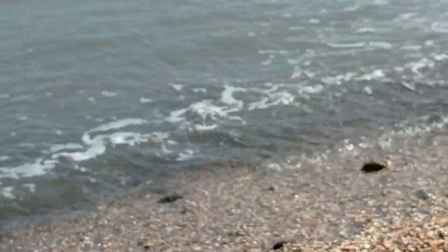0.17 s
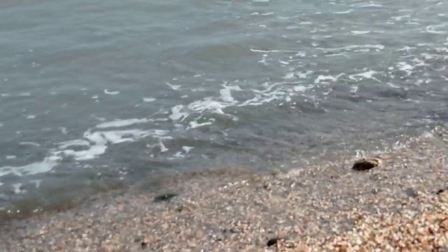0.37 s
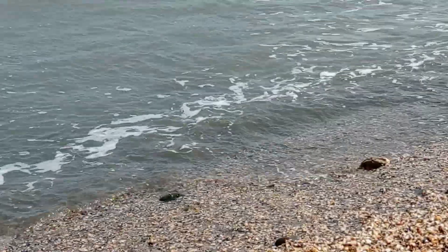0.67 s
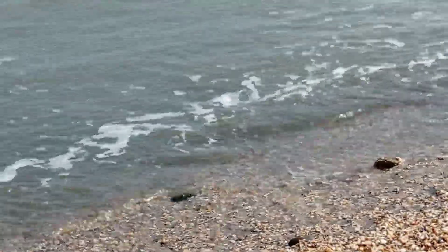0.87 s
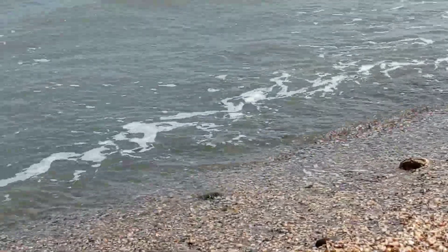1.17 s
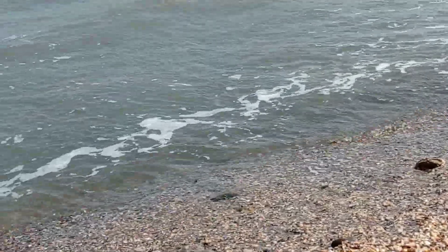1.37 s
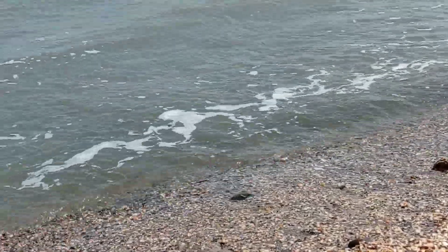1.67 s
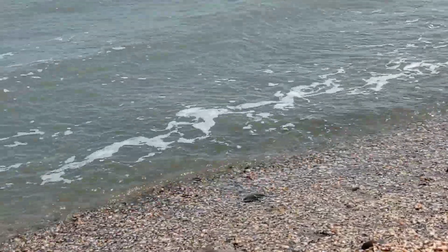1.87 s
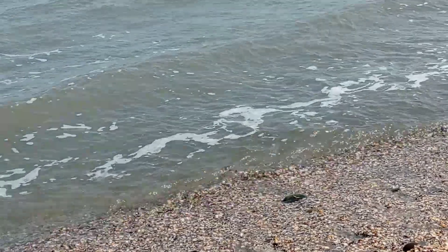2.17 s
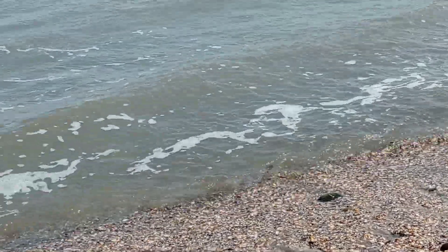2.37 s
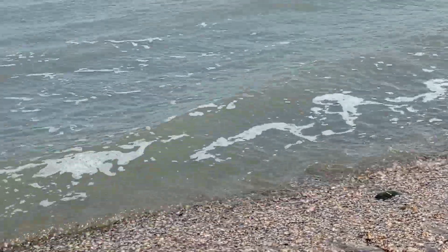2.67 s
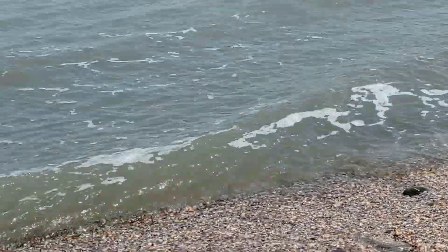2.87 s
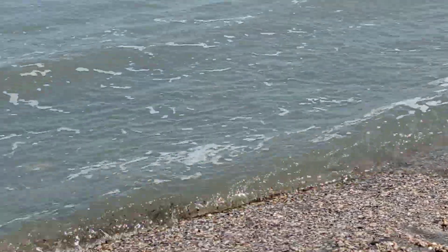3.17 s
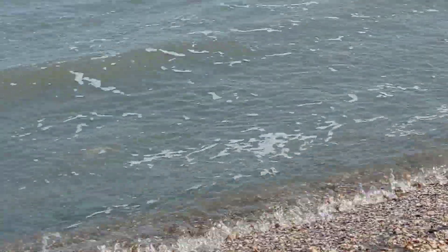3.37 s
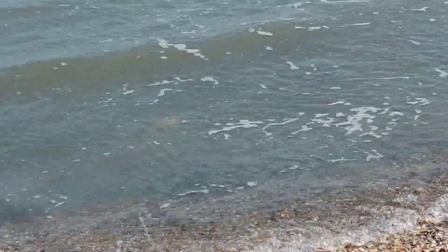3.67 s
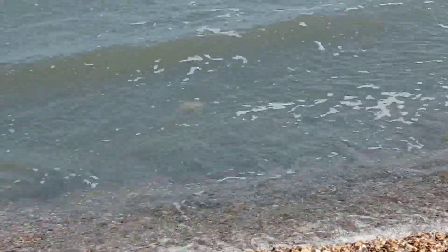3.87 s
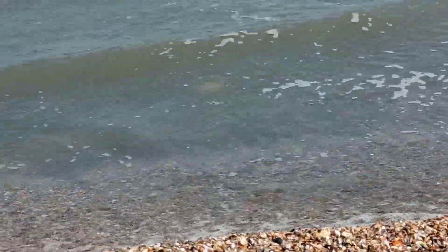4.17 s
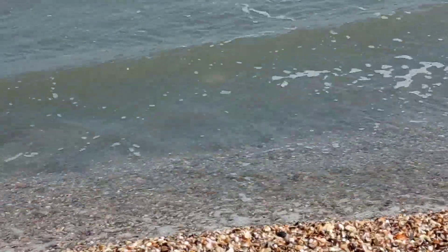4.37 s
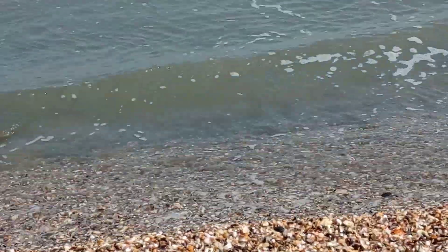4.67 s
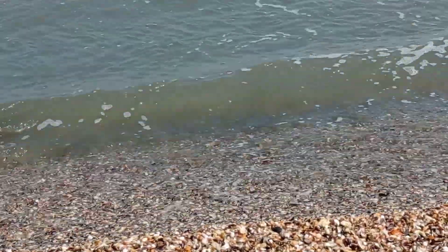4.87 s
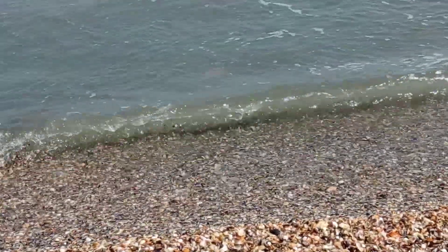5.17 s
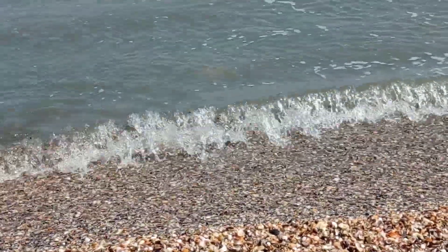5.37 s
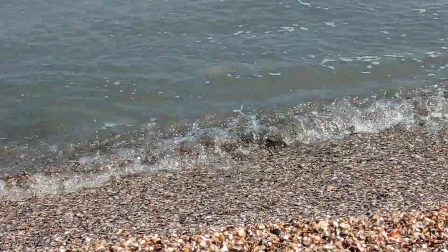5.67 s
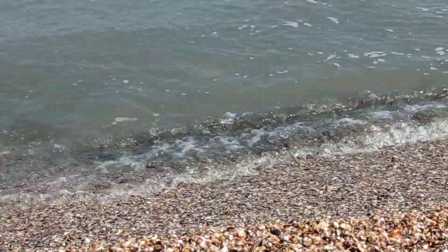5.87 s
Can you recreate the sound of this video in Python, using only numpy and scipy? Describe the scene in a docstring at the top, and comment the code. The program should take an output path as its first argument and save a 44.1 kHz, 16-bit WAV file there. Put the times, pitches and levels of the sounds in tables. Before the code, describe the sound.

Wind buffets a small microphone at the water's edge, making irregular bassy flutters and bumps. Behind it the sea roars smoothly and evenly. At first there is little close water; later trapped air gurgles and thin foam hiss swells at about three seconds, fades slowly, and swells again past five. Sparse high ticks of drops and shells and some low watery plops add detail.

```python
"""Small waves wash onto a beach of pebbles and shells, heard through a small microphone in a breeze.
From the start, eddies of wind on the microphone port make a lumpy rumble (shaped noise) with single thumps
(short tones), and surf along the shore roars steadily (smooth noise). Faint gurgles of trapped air (ringing
bubbles) soon grow; from about 1.5 s foam fizzes in surges (dense tiny bubbles, clicks and hiss).
Drops then tick on the shells (short high tones), and late on a few large air pockets plop."""
import sys
import numpy as np
from scipy import signal
from scipy.fft import rfft, irfft, next_fast_len
from scipy.io import wavfile

SR = 44100
rng = np.random.default_rng(int(sys.argv[2]) if len(sys.argv) > 2 else 0)


def store_pcm(level_fs):
    """Save levels as 16-bit WAV."""
    pcm = np.round(np.clip(level_fs, -1, 1) * 32767).astype(np.int16)
    wavfile.write(sys.argv[1], SR, np.atleast_2d(pcm).T)


N = 265482  # length of the scene [samples]


def from_db(db):
    """Turns decibels into a gain."""
    return 10 ** (np.asarray(db) / 20)


def rms_one(x):
    """Scales a signal to an rms (average strength) of 1."""
    return x / np.sqrt(np.mean(x ** 2) + 1e-20)


def in_time(rows):
    """Draws straight lines between the rows of a time table; each column becomes one value a sample."""
    times, *columns = np.transpose(rows)
    return [np.interp(np.arange(N) / SR, times, column) for column in columns]


def drift(rate_hz):
    """Slow random wandering with a spread of 1: noise smoothed twice by a one-pole low-pass."""
    step = 20  # one slow value for every 20 samples
    settle = 4000  # slow values thrown away while the filter settles
    r = np.exp(-2 * np.pi * rate_hz * step / SR)
    noise = rng.standard_normal(N // step + settle + 2)
    slow = signal.lfilter([1], [1, -2 * r, r * r], noise)[settle:]
    return np.interp(np.arange(N) / step, np.arange(len(slow)), rms_one(slow))


def colour(x, spectrum):
    """Filters a signal by a table of (frequency [Hz], level [dB]), then sets its rms to 1."""
    size = next_fast_len(N)
    hz = np.arange(1, size // 2 + 2) * SR / size
    points = np.array(spectrum)
    level_db = np.interp(np.log(hz), np.log(points[:, 0]), points[:, 1])
    shaped = irfft(rfft(x, size) * from_db(level_db), size)[:N]
    return rms_one(shaped)


def ring(clicks, hz, t60):
    """Each click sets a sine ringing, as high as the click, that fades by 60 dB in t60 seconds."""
    r = from_db(-60 / (t60 * SR))
    w = 2 * np.pi * hz / SR
    # the tiny offset keeps the filter clear of very slow, near-zero numbers
    return signal.lfilter([0, np.sin(w)], [1, -2 * r * np.cos(w), r * r], clicks + 1e-18)


def grains(per_s, spread_db):
    """Clicks at random moments, most small, a few large, pushing up or down by chance."""
    sizes = from_db(spread_db * np.minimum(rng.exponential(1, N), 5))
    signs = rng.choice([-1, 1], N)
    happens = rng.random(N) < per_s / SR
    return sizes * signs * happens


def bubbles(per_s, spread_db, cycles, pitches_hz):
    """Bubbles are born at random and ring for some cycles at a pitch set by their size; rms 1."""
    clicks = grains(per_s, spread_db)
    dealt = rng.integers(0, len(pitches_hz), N)  # which pitch a click gets
    rings = [ring(clicks * (dealt == k), hz, cycles / hz) for k, hz in enumerate(pitches_hz)]
    return rms_one(sum(rings))


def struck(rows):
    """Each (time, peak dB, Hz, reach) row is a short tone that swells to its moment and fades."""
    out, t = np.zeros(N), np.arange(N) / SR
    for s, peak_db, hz, reach in rows:
        near = slice(max(round((s - reach) * SR), 0), round((s + reach) * SR))
        from_peak = t[near] - s
        swell = np.exp(-(4 * from_peak / reach) ** 2)
        out[near] += from_db(peak_db) * swell * np.cos(2 * np.pi * hz * from_peak)
    return out


def wind():
    """Lumpy turbulence shakes the port; the sharper part of its rumble grows faster than the gust."""
    # strength of the gust, before chance and tone changes: (time [s], level [dB])
    gust_curve = [(0, -28), (.2, -29), (.3, -36.5), (.45, -30), (.85, -27.5), (.92, -31), (1.28, -26.5),
                  (1.6, -26.5), (1.88, -31.5), (2.36, -30.5), (2.48, -26.5), (2.75, -32), (3.24, -24.5),
                  (3.4, -33.5), (3.67, -37), (3.8, -30.5), (4.2, -33), (4.25, -24), (4.44, -27.5),
                  (4.58, -30.5), (5.42, -26.5), (5.68, -35), (5.86, -25.5), (6.02, -28.5)]
    # tone of the eddies: (frequency [Hz], relative level [dB per Hz])
    eddy_spectrum = [(30, -33), (50, -11), (80, -0.5), (120, -0.5), (200, -4), (300, -9), (450, -18),
                     (800, -28), (1600, -34), (5000, -120)]
    # gain of the deepest rumble against the rest: (time [s], level [dB])
    deep_curve = [(0, 2), (1.5, -5), (2.1, 2), (2.8, 0.2), (4.2, 3), (5.2, -2.5), (6.02, 4)]
    # single eddies that thump the membrane:
    # (time [s], peak level [dB], pitch [Hz], reach either side of the peak [s])
    thumps = [(0.1834, -17, 153, 0.022), (0.465, -16, 150, 0.011), (0.6035, -18.5, 119, 0.051),
              (0.7684, -15.5, 154, 0.022), (0.809, -19, 187, 0.013), (0.848, -11.5, 194, 0.0035),
              (0.9776, -15.3, 195, 0.0097), (1.2416, -11, 178, 0.022), (1.2961, -9.5, 281, 0.0035),
              (1.316, -9.5, 203, 0.0084), (1.326, -17.5, 257, 0.0064), (1.99, -20.5, 142, 0.042),
              (2.18, -17, 132, 0.021), (2.4777, -13, 233, 0.0048), (2.6254, -14, 160, 0.01),
              (2.7521, -17, 180, 0.03), (2.797, -18, 150, 0.017), (2.864, -13.5, 156, 0.0083),
              (3.1241, -19, 189, 0.023), (3.203, -14.5, 197, 0.0052), (4.3687, -11, 165, 0.0039),
              (4.4417, -15, 167, 0.01), (4.7216, -15.5, 170, 0.025), (4.745, -17, 178, 0.0044),
              (4.969, -14.5, 194, 0.0053), (5.2984, -15.5, 173, 0.011), (5.494, -10, 181, 0.003),
              (5.8565, -15.5, 163, 0.019), (5.8874, -11.5, 136, 0.012), (5.949, -23, 156, 0.01)]

    gust_db = in_time(gust_curve)[0] + 1.16 * drift(8.4)  # chance swing
    lumps_db = 0.36 * drift(44.0) + 1.18 * drift(34.5)
    eddies = colour(rng.standard_normal(N) * from_db(lumps_db), eddy_spectrum)

    sharp = signal.sosfilt(signal.butter(2, 260.0, "high", fs=SR, output="sos"), eddies)
    deep = signal.sosfiltfilt(signal.butter(2, 100.0, fs=SR, output="sos"), eddies)
    sharp_gain = from_db(2.05 * (gust_db + 24.5))  # no change at a gust of -24.5 dB
    deep_gain = from_db(in_time(deep_curve)[0])
    # a gain minus 1 adds only the change to what eddies already hold
    rumble = eddies + sharp * (sharp_gain - 1) + deep * (deep_gain - 1)
    return from_db(gust_db) * rumble + struck(thumps)


def surf(roar_db):
    """Countless far bubbles merge into smooth noise that wavers a little."""
    # tone of the roar: (frequency [Hz], relative level [dB per Hz])
    roar_spectrum = [(350, -3.5), (760, -2), (950, -7.5), (1130, -14.5), (1600, -6), (2650, -15),
                     (3000, -19.5), (4100, -22), (4750, -30), (5700, -23.5), (6250, -29), (6800, -27.5),
                     (7600, -39.5), (12500, -51), (15700, -76)]
    roar = colour(rng.standard_normal(N), roar_spectrum)
    return from_db(roar_db + 0.5 * drift(8.8)) * roar


def gurgle(gurgle_db):
    """Middling pockets of trapped air ring as the water turns over; a few large ones plop."""
    # large air pockets that ring in the breaking crest: (time [s], peak level [dB], pitch [Hz])
    pockets = [(5.338, -29, 730), (5.508, -33, 1060), (5.6, -28.5, 840), (5.616, -33, 1150),
               (5.636, -26.5, 840)]
    reach_cycles = 16  # cycles either side of a plop's peak
    plops = struck([(s, peak_db, hz, reach_cycles / hz) for s, peak_db, hz in pockets])
    middling = bubbles(2500.0, 1.4, 33.0, np.geomspace(820.0, 1450.0, 12))
    return from_db(gurgle_db) * middling + plops


def foam(top_db):
    """Tiny bubbles burst so densely that they almost blend into hiss; each size clumps in its own way."""
    # tone of the foam as the microphone colours it: (frequency [Hz], relative level [dB per Hz])
    foam_spectrum = [(500, -19), (1200, 5), (2750, 4), (3150, -4), (4900, -7), (6200, -1), (7300, -7),
                     (8000, -10.5), (10000, -18), (12000, -28.5), (13900, -29), (14600, -18), (15800, -20)]
    pings = bubbles(2500.0, 2.8, 45.0, np.geomspace(3200.0, 15300.0, 24))
    crackle = rms_one(grains(9000.0, spread_db=3.0))
    stray_drops = bubbles(30.0, 1.5, 14.0, np.geomspace(8500, 15300, 8))
    hiss = rng.standard_normal(N)
    mix = 0.45 * pings + 0.51 * crackle + from_db(-14.0) * stray_drops + hiss
    bursts = colour(mix, foam_spectrum)

    # the part between 7.5 and 12 kHz sets the level
    bright = signal.sosfilt(signal.butter(4, [7500, 12000], "band", fs=SR, output="sos"), bursts)
    rest = bursts / np.std(bright)

    # split off one pitch band after another, from low to high, and let each flicker by chance
    together_db = 0.36 * drift(27.0)  # flicker shared by all bands
    out = 0
    for edge_hz in (1800, 3200, 5000, 7600, 10300):
        below = signal.sosfiltfilt(signal.butter(3, edge_hz, fs=SR, output="sos"), rest)
        out = out + below * from_db(together_db + 1.5 * drift(45.0))
        rest = rest - below
    treble = rest * from_db(top_db + together_db + 1.5 * drift(28.0))
    return wash() * (out + treble)


def wash():
    """Gain of the fizz: each surge swells to its peak and drains away, over the resting foam."""
    # surges of water up the shingle: (time of the peak [s], fizz level [dB],
    # time to rise by 10 dB [s], time to fall by 10 dB [s])
    surges = [(1.55, -65.5, 0.1, 0.35), (2.92, -63, 0.05, 0.22), (2.98, -53.5, .04, .05),
              (3.25, -52, 0.33, 0.43), (4.09, -63, 0.041, .25), (4.29, -63.5, .1, 0.24),
              (5.03, -67, 0.35, 0.58), (5.35, -57, .05, 0.041), (5.56, -59.5, 0.6, 0.34)]
    t = np.arange(N) / SR
    power = from_db(-68) ** 2  # the fizz while the water lies still
    for s, peak_db, rise, fall in surges:
        below_peak_db = 10 * np.maximum((s - t) / rise, (t - s) / fall)
        power = power + from_db(peak_db - below_peak_db) ** 2
    return np.sqrt(power)


def ticks():
    """Drops and shells tick as very short high tones."""
    # the ticks: (time [s], peak level [dB], pitch [Hz], reach either side of the peak [s])
    tick_rows = [(1.8073, -59, 14640, .004), (2.4165, -41, 3490, .003), (3.054, -43, 5000, .001),
                 (3.192, -31, 6210, .006), (3.3347, -24, 5930, 0.0017), (3.583, -44, 7700, .002),
                 (3.8135, -49, 6110, .003), (3.8395, -32, 6460, 0.0022), (4.0939, -30, 3270, 0.0013),
                 (4.5179, -60, 14000, .0015), (4.83, -30.5, 4000, 0.0011), (5.1093, -33, 2760, .004),
                 (5.3488, -27, 6700, .0007), (5.4558, -42, 6170, .004)]
    return struck(tick_rows)


def scene():
    """Wind at the port over far surf and the near wash, faded in and out within a few milliseconds."""
    # the waves: (time [s], surf roar before its waver [dB], gurgle without plops [dB],
    # gain of the foam's treble above about 10 kHz [dB])
    waves = [(0, -36.5, -67, -1), (.6, -34.5, -68, -3), (1.2, -34.5, -59, 0), (1.9, -37, -54, 3.5),
             (2.8, -37, -47, 2.5), (3.0, -36, -48.5, 3.5), (3.47, -38.5, -39, 4), (3.65, -36.5, -45, -1),
             (4.35, -37, -45.5, 0), (5.0, -34.5, -43, 4), (5.35, -36.5, -44, -0.5), (5.62, -36, -39, -3),
             (5.75, -36, -44, -.8), (6.02, -37.5, -48, 3)]
    roar_db, gurgle_db, top_db = in_time(waves)
    shore = wind() + surf(roar_db) + gurgle(gurgle_db) + foam(top_db) + ticks()
    from_edge = np.minimum(np.arange(N), np.arange(N)[::-1])
    fade = np.minimum(from_edge / 130, 1)  # 130 samples at each end
    return (shore * fade)[None]


def record(dry):
    """The microphone capsule loses the deepest bass, and the top is cut steeply."""
    bass_hz, top_hz = 47.4, 15720
    thin = signal.sosfilt(signal.butter(3, bass_hz, "high", fs=SR, output="sos"), dry)
    # 0.5 dB of ripple below the cut, at least 70 dB of loss well above it
    return signal.sosfilt(signal.ellip(14, 0.5, 70, top_hz, fs=SR, output="sos"), thin)


dry = scene()
out = record(dry)
store_pcm(out)
```